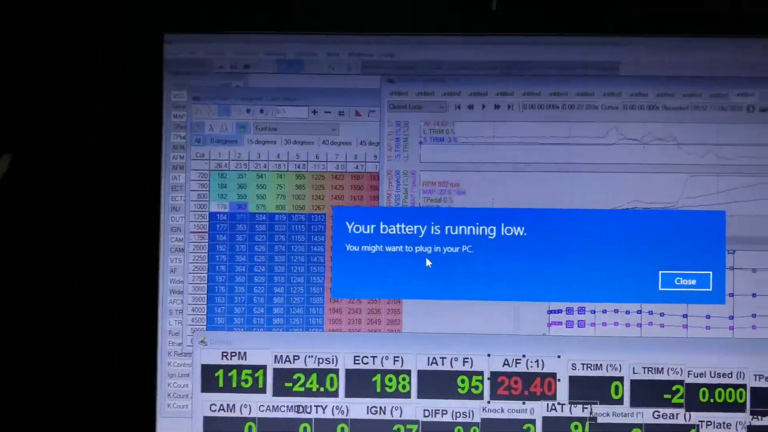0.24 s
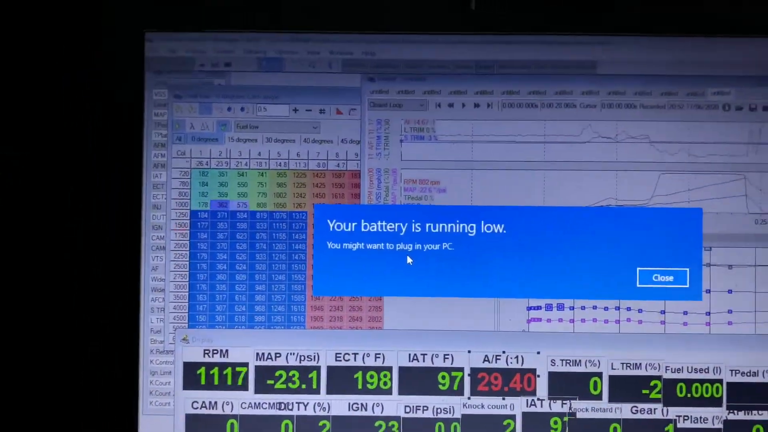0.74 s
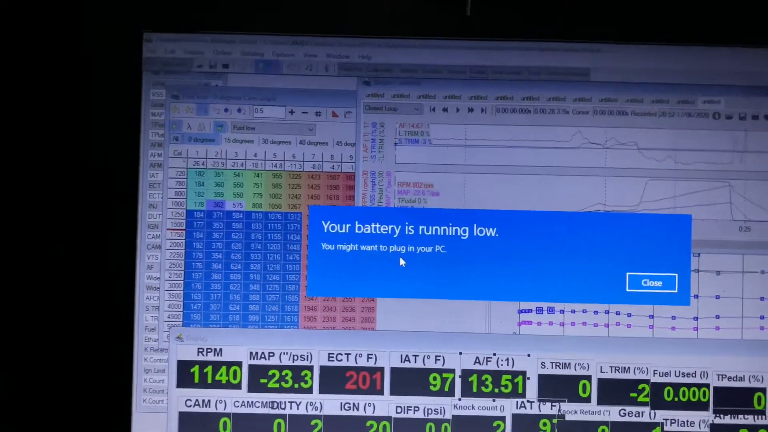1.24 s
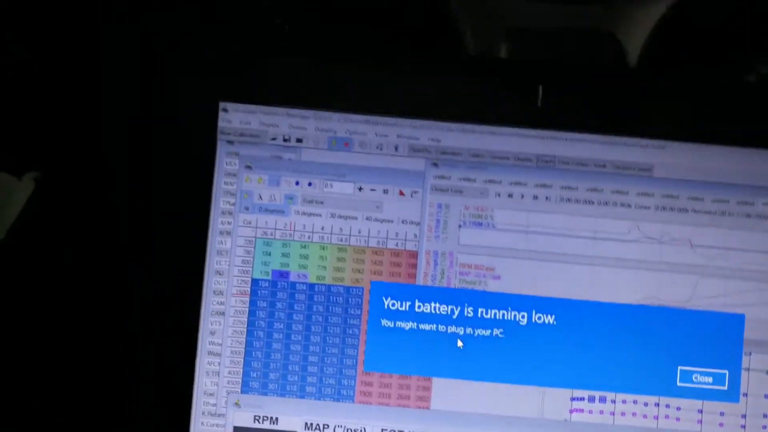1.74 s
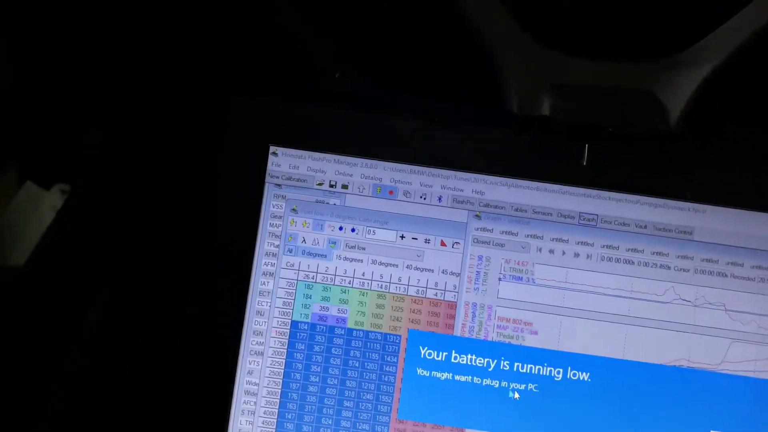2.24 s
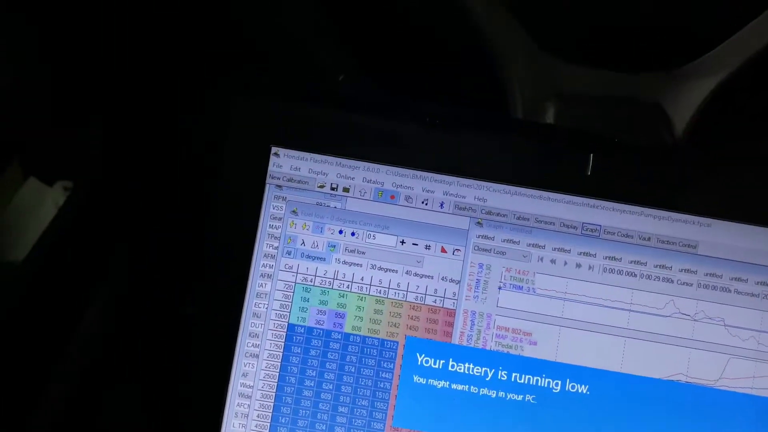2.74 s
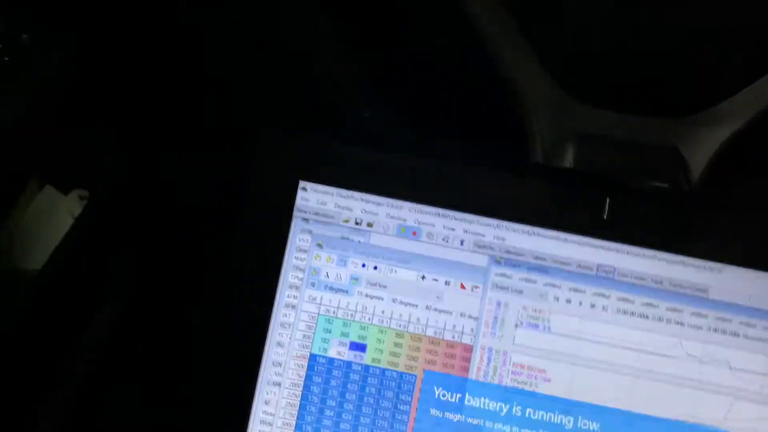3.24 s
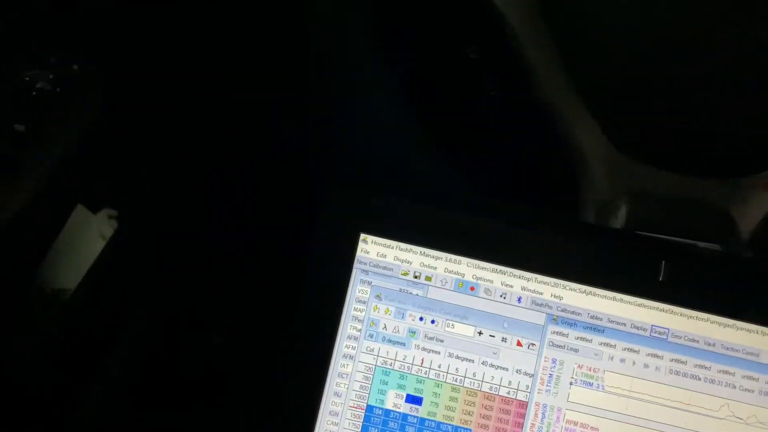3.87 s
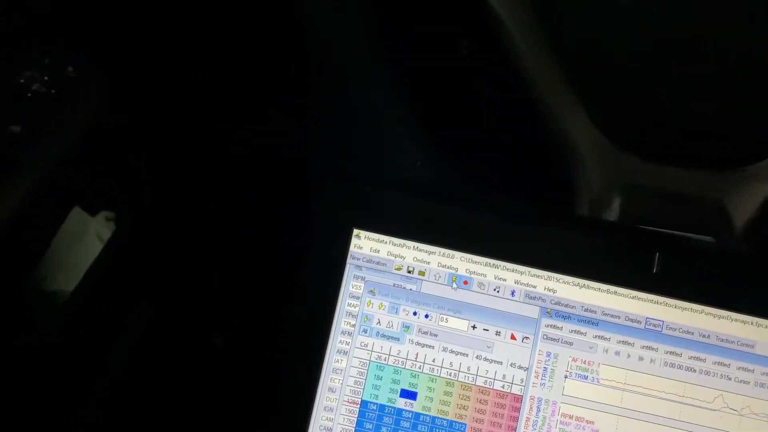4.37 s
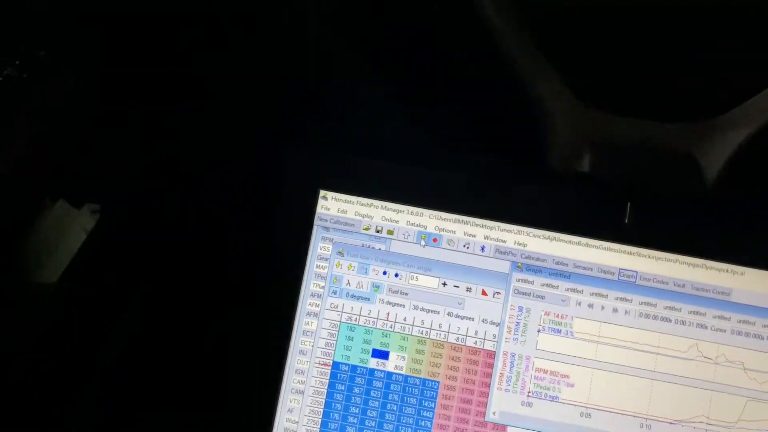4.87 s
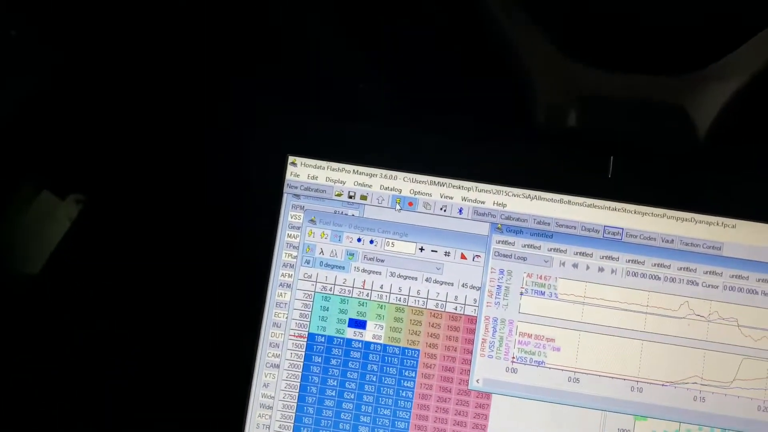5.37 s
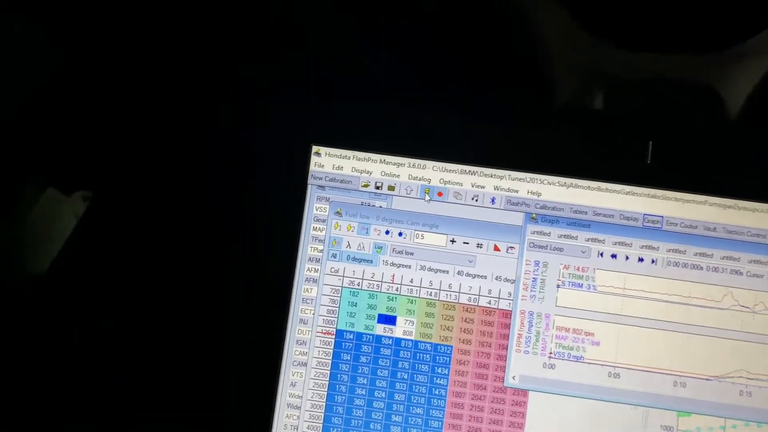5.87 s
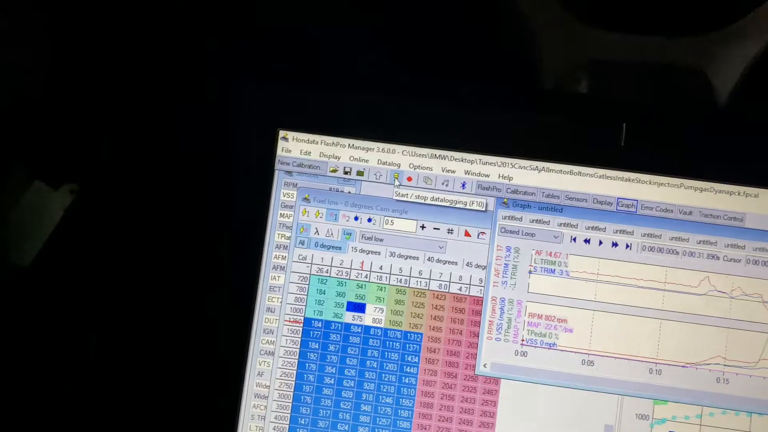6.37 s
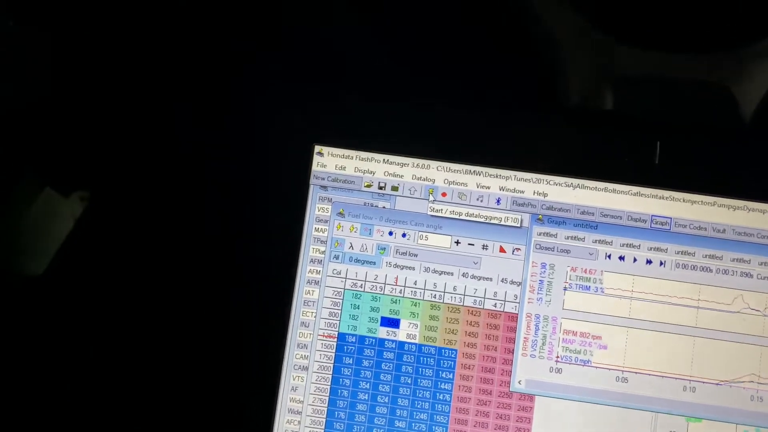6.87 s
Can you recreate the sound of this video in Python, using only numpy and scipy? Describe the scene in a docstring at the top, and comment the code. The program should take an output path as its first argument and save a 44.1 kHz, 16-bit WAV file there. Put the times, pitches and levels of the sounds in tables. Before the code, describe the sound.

A four-cylinder car engine is heard from the driver's seat, its exhaust low and muffled. It opens on a brief blip of throttle, holds a raised idle until about 1.3 seconds, then sinks to a slow idle by 3 seconds. From there a cooling fan outside rushes gradually louder, carrying a faint wavering tone, and the engine hum grows fuller by about 5 seconds. Close to the microphone, a laptop gives a faint knock near 1 second, small button ticks near 3 and 4.5 seconds, a hollow plastic knock at 5.4 and a quick cluster of clicks and taps between 6.2 and 6.4. At about 6.6 seconds a fingertip briefly scrapes the plastic and the throttle opens: the intake hisses and the exhaust booms as the revs dip and recover. One dull thud sounds just after 7 seconds.

```python
"""Four-cylinder car from the driver's seat

The revs sink from a blip to a slow idle; then the throttle opens, the intake hisses and the
exhaust booms as the engine labours. Each firing drives the resonances of pipe and cabin.
A cooling fan rushes outside. Close to the microphone a laptop's buttons click and knocks
ring its hollow case. One dull thud sounds near the end."""
import sys
import numpy as np
from scipy import signal
from scipy.fft import rfft, irfft
from scipy.io import wavfile

SR = 44100
rng = np.random.default_rng(int(sys.argv[2]) if len(sys.argv) > 2 else 0)


def waveform_to_disk(signal):
    """Save audio, clipped to [-1, 1], as 16-bit WAV at the path in sys.argv[1]."""
    frames = np.transpose(np.atleast_2d(signal))
    scaled = np.clip(frames, -1, 1) * 32767
    samples = np.round(scaled).astype(np.int16)
    wavfile.write(sys.argv[1], SR, samples)


N = 313595
T = np.arange(N) / SR
HZ = np.fft.rfftfreq(N, 1 / SR)

# engine load (time [s], level re light idle [dB])
ENGINE_LOAD = [(1.3, 4.5), (2.1, -1.5), (3, -2), (5.3, 4.5), (6.1, 5), (6.59, 8.5), (6.68, 10), (6.78, 12),
               (6.9, 9)]
# rush of air and machinery (time [s], level [dB])
RUSH_LEVEL = [(0, -64.5), (1.5, -63.5), (2.7, -63), (3.4, -60), (4.4, -58.5), (5.3, -57.5), (6.4, -55.5),
              (7.11, -57.5)]
# microphone port balance (frequency [Hz], left minus right [dB])
PORT_BALANCE = [(55, -2.5), (80, 4.5), (115, 0), (160, 2), (270, 2), (520, -2), (1100, 6), (2200, 3.5),
                (4500, 3), (8000, 2), (13000, -2)]
# right port behind left (frequency [Hz], phase [rad])
PORT_LAG = [(30, 0.5), (130, 0.29), (280, 1.33), (520, 1.14), (780, 3.5), (1030, 0.5), (1300, 4.5),
            (1900, 2.5), (3200, -1), (8000, 1.5), (12000, 1)]


def amp(db):
    """Decibels to gain."""
    return 10 ** (np.asarray(db) / 20)


def unit(x):
    """Scale to rms 1; for stereo, the rms of the mid signal."""
    return x / np.sqrt(np.mean(np.atleast_2d(x).mean(0) ** 2) + 1e-20)


def curve(rows):
    """Time table at every sample."""
    return np.interp(T, *np.transpose(rows))


def spectrum(rows, hz=HZ):
    """Frequency table, interpolated on a log axis."""
    row_hz, value = np.transpose(rows)
    return np.interp(np.log(hz + 1), np.log(row_hz + 1), value)


def peaks_db(modes, hz=HZ):
    """Summed resonance peaks and dips."""
    return sum(db / (1 + (2 * (hz - centre) / width) ** 2) for centre, width, db in modes)


def drift(rate_hz):
    """Slow random wander, rms 1."""
    return unit(irfft(rfft(rng.standard_normal(N)) / (1 + (HZ / rate_hz) ** 4), N))


def stereo_noise(colour_db, gate=1):
    """Gated, coloured noise at the two microphone ports."""
    # likeness of the ports (frequency [Hz], coherence [0-1])
    port_coherence = [(30, 0.53), (130, 0.34), (260, 0.53), (520, 0.4), (1000, 0.55), (2000, 0.34),
                      (4500, 0.033), (8000, 0.1), (12000, 0.45)]
    left, independent = rfft(rng.standard_normal((2, N)) * gate)
    coherence = np.clip(spectrum(port_coherence), 0, 1)
    right = coherence * left + np.sqrt(1 - coherence ** 2) * independent
    right *= np.exp(-1j * spectrum(PORT_LAG))
    balance = amp(spectrum(PORT_BALANCE) / 2)
    return unit(irfft(np.array([left * balance, right / balance]) * amp(colour_db), N))


def stereo_tone(phase, hz):
    """A tone at the two microphone ports."""
    balance, lag_rad = amp(spectrum(PORT_BALANCE, hz) / 2), spectrum(PORT_LAG, hz)
    return np.sqrt(2) * np.array([balance * np.cos(phase), np.cos(phase - lag_rad) / balance])


def add(mix, start_s, sound):
    """Mix in a stereo sound."""
    part = mix[:, int(start_s * SR):][:, :sound.shape[1]]
    part += sound[:, :part.shape[1]]


def ring(modes, rise_s=0.0091):
    """Damped modes after a jolt."""
    age = T[:SR // 4]
    tones = sum(amp(db - 60 * age / t60) * stereo_tone(2 * np.pi * hz * age, hz) for hz, db, t60 in modes)
    return (1 - np.exp(-age / rise_s)) * tones


def burst(noise, t60_s, rise_s=0.00024):
    """Random slice of noise with fast attack and exponential decay."""
    age = T[:SR // 4]
    start = rng.integers(N - len(age))
    return noise[:, start:start + len(age)] * (1 - np.exp(-age / rise_s)) * amp(-60 * age / t60_s)


def microphone_hiss(level_db=-82):
    """Steady self-noise of the microphone."""
    # (frequency [Hz], level [dB])
    colour = [(500, -17), (4000, 8), (7000, 1), (8500, -8), (10200, 2.5), (12300, -7), (13400, -28),
              (15300, -2)]
    return amp(level_db) * stereo_noise(spectrum(colour))


def fan_rush(turns, throb=0.023, flutter_db=0.5, ripple_db=1.5, ripple_step_hz=35):
    """Fan and engine-bay noise, throbbing with the firings, coloured by panels and cabin modes."""
    # (frequency [Hz], level [dB])
    fan_colour = [(300, -9.5), (540, 1), (650, -3), (900, -0.5), (1200, -3.5), (1500, -2.5), (2100, -5),
                  (2700, -11.5), (3500, -15), (4100, -19.5), (7200, -25.5), (8200, -32.5), (12000, -37.5),
                  (13500, -55)]
    # panel resonances and dips (frequency [Hz], width [Hz], gain [dB])
    panels = [(660, 160, -0.5), (934, 160, 1.5), (1090, 79, 1), (5590, 180, -7.5), (5690, 110, 6.5),
              (6650, 290, 3.5)]
    # microphone rising from behind the laptop's screen (time [s], share in the clear [0-1])
    clearance = [(1.4, 0.04), (3.3, 0.99)]
    # colour behind the screen (frequency [Hz], gain [dB])
    screen_colour = [(500, -1.5), (700, -0.5), (1050, -3), (1500, 0.5), (2000, -1), (2600, 0.5),
                     (3800, -0.5), (6000, 1)]
    # resonances behind the screen (frequency [Hz], width [Hz], gain [dB])
    screen_modes = [(2430, 190, 1), (3610, 200, 5.5)]
    cabin_db = ripple_db * np.interp(HZ / ripple_step_hz, np.arange(SR), rng.standard_normal(SR))
    colour_db = spectrum(fan_colour) + peaks_db(panels) + cabin_db
    gate = 1 + throb * np.cos(2 * np.pi * turns)
    screened = stereo_noise(colour_db + spectrum(screen_colour) + peaks_db(screen_modes), gate)
    direct = stereo_noise(colour_db, gate)
    clear = np.clip(curve(clearance), 0, 1)
    noise = np.sqrt(1 - clear) * screened + np.sqrt(clear) * direct
    return amp(curve(RUSH_LEVEL) + flutter_db * drift(14)) * noise


def fan_tone(blade_hz=496, waver_hz=3, flutter_db=2.3):
    """Wavering blade tone, slowly rising out of the rush."""
    # (time [s], level re rush [dB])
    prominence = [(1.2, -20), (3.3, -8.5), (4.3, -9.5), (5.0, -5.5), (6.2, -6), (6.7, -10.5)]
    phase = 2 * np.pi * np.cumsum(blade_hz + waver_hz * drift(16.4)) / SR
    level_db = curve(RUSH_LEVEL) + curve(prominence) + flutter_db * drift(6.7)
    return amp(level_db) * stereo_tone(phase, blade_hz)


def cabin_thud(start_s=7.067, gain_db=-18):
    """One jolt rings two low modes."""
    modes = [(127.5, -1, 0.12), (145, -9.5, 0.1)]  # (frequency [Hz], level [dB], t60 [s])
    out = np.zeros((2, N))
    add(out, start_s, amp(gain_db) * ring(modes))
    return out


def finger_scrape(start_s=6.577, gain_db=-47.5, rise_s=0.0037, t60_s=0.042):
    """A fingertip slips briefly on the laptop's plastic."""
    # (frequency [Hz], level [dB])
    colour = [(1000, -12), (2200, 5), (4000, 5), (5300, -4), (6600, 2), (8500, -13), (11000, 1),
              (13500, -15)]
    out = np.zeros((2, N))
    add(out, start_s, amp(gain_db) * burst(stereo_noise(spectrum(colour)), t60_s, rise_s))
    return out


def laptop_clicks(tick_t60_s=0.046, snap_t60_s=0.0025, knock_t60_s=0.064,
                  knock_rise_s=0.001, ring_rise_s=0.0039, spot_db_per_octave=-5.5):
    """Impacts on plastic: buttons snap brightly, knocks ring the hollow case."""
    # impact noise (frequency [Hz], level [dB])
    tick_colour = [(500, -30), (3000, -2), (5200, -11), (7000, -3), (8500, -11), (11000, -1.5),
                   (12600, -11), (13600, -17), (15500, -9.5)]
    knock_colour = [(150, -17), (350, -5), (550, -2), (750, 8), (1400, 9.5), (2400, -0.5), (3400, -5.5),
                    (5500, -11), (7000, -13), (8500, -55), (11500, -27), (15500, -44)]
    # button ticks (time [s], gain [dB])
    ticks = [(2.9961, -60), (4.4912, -53.5), (4.596, -57.5), (6.2703, -50.5), (6.576, -53)]
    # (time [s], impact [dB], hollow ring [dB], low ring [dB], bright tick [dB], struck spot's pitch [Hz])
    knocks = [(1.105, -56, -68, -57, -84, 1500), (5.3865, -48, -60, -54, -70, 1400),
              (5.3965, -45.5, -44, -49, -59, 1380), (6.2225, -42.5, -39, -63, -60, 1550),
              (6.2285, -53, -62, -38, -71, 1550), (6.2405, -48, -43, -48, -65, 2400),
              (6.2786, -47, -49, -53, -54, 1300), (6.315, -53, -51, -60, -69, 2250),
              (6.3734, -49, -49, -57, -65, 1300), (6.3812, -43.5, -39, -63, -60, 2200),
              (6.9174, -49, -58, -45, -67, 1100), (7.0618, -47, -49, -44, -72, 1490)]
    # hollow ring and low ring (frequency [Hz], level [dB], t60 [s])
    case_modes = [(1150, -5, 0.026), (1368, 1.5, 0.041), (1553, 6, 0.041), (1900, -1, 0.045),
                  (2227, 1.5, 0.036), (2425, -2, .035), (2760, -9, .04), (4220, -7, 0.032),
                  (6750, -5.5, 0.04)]
    body_modes = [(545, -2, 0.048), (501, -1, 0.048), (427, -1.5, 0.057), (342, -4, 0.055),
                  (292, -15, 0.06)]
    tick, knock = stereo_noise(spectrum(tick_colour)), stereo_noise(spectrum(knock_colour))
    out = np.zeros((2, N))
    for start_s, gain_db in ticks:
        bright = amp(-3) * burst(tick, tick_t60_s)
        snap = amp(1) * burst(tick, snap_t60_s)
        hollow = amp(-7) * burst(knock, tick_t60_s)
        add(out, start_s, amp(gain_db) * (bright + snap + hollow))
    for start_s, impact_db, case_db, body_db, bright_db, spot_hz in knocks:
        # the struck spot favours modes near its pitch
        excited = [(hz, db + spot_db_per_octave * abs(np.log2(hz / spot_hz)), t60)
                   for hz, db, t60 in case_modes]
        add(out, start_s, amp(impact_db - 3) * burst(knock, knock_t60_s, knock_rise_s))
        add(out, start_s, amp(bright_db) * burst(tick, knock_t60_s, knock_rise_s))
        add(out, start_s, amp(case_db) * ring(excited, ring_rise_s))
        add(out, start_s, amp(body_db + 4) * ring(body_modes, ring_rise_s))
    return out


def throttle_opening(ease_s=0.85, shut_s=0.09):
    """Each pedal press ramps up, eases while held and falls shut."""
    # (start [s], rise [s], hold [s], opening [0-1])
    presses = [(0.0, 0.05, 0.14, 0.91), (6.579, 0.018, 0.19, 1.0), (6.837, 0.025, 0.21, 0.45)]
    throttle = np.zeros(N)
    for start_s, rise_s, hold_s, opening in presses:
        age = np.maximum(T - start_s, 0)
        release = np.exp(-age / ease_s - np.maximum(age - hold_s, 0) / shut_s)
        throttle += opening * np.minimum(age / rise_s, 1) * release
    return np.clip(throttle, 0, 1)


def intake_hiss(throttle, level_db=-65, far_db=-7, move_s=4):
    """Air hisses past the open throttle plate, quieter until the microphone has moved."""
    # (frequency [Hz], level [dB])
    colour = [(850, -24), (1070, 19.5), (1250, -12), (4500, -27), (6000, -7), (7400, -9), (8400, -17),
              (10200, -10), (12000, -24), (13500, -58)]
    position_db = far_db * (1 - np.clip(T / move_s, 0, 1))
    return throttle * amp(level_db + position_db) * stereo_noise(spectrum(colour))


def stumble_gain():
    """Weak firings briefly dip the exhaust."""
    # (time [s], half length [s], dip [dB])
    dips = [(0.342, 0.063, -1.5), (1.317, 0.081, -2), (6.82, 0.014, -2), (7.025, 0.047, -3.5)]
    return amp(sum(db * np.exp(-((T - time_s) / half_s) ** 2) for time_s, half_s, db in dips))


def gas_puffs(turns, revs_oct, throttle, shut_db=-54, open_db=-63, coast_db_per_octave=-9,
              flow_db=12, flow_db_per_octave=21, decay_firings=0.52):
    """Turbulent gas leaves with each firing: less when coasting, growling with the throttle open."""
    # (frequency [Hz], level [dB])
    colour = [(15, -28), (35, -14), (55, 5), (90, -3.5), (135, -2.5), (200, -2.5), (260, -12), (330, -11),
              (440, -13), (560, -26.5), (700, -40), (1500, -61)]
    # pipe resonances under hard puffs (frequency [Hz], width [Hz], gain [dB])
    growl_modes = [(218, 20, 4), (289, 25, 6), (400, 23, 9.5), (620, 230, 4)]
    gas_db = curve(ENGINE_LOAD) + throttle * (flow_db + flow_db_per_octave * revs_oct)
    gate = 1 + np.exp(-(turns % 1) / decay_firings)
    coast_db = coast_db_per_octave * np.maximum(revs_oct, 0)
    soft = amp(shut_db + coast_db) * stereo_noise(spectrum(colour), gate)
    growl = amp(open_db) * stereo_noise(spectrum(colour) + peaks_db(growl_modes), gate)
    return amp(gas_db) * ((1 - throttle) * soft + np.sqrt(throttle) * growl)


def pipe_thumps(turns, throttle, gain_db=-55, uneven=0.23):
    """With the throttle open, each firing kicks the pipe into ringing."""
    # (frequency [Hz], level [dB], t60 [s])
    modes = [(116, -5, 0.067), (212, -12, 0.13), (280, -17, 0.13), (401, -12, 0.12)]
    fired = np.diff(np.floor(turns), prepend=0)
    strength = amp(gain_db + curve(ENGINE_LOAD)) * (1 + uneven * rng.standard_normal(N))
    kicks = fired * throttle * strength
    return signal.oaconvolve(kicks[None], ring(modes), axes=1)[:, :N]


def pipe_drone(throttle, pitch_hz=159, level_db=-40.5, waver_hz=2, flutter_db=2):
    """An open throttle sustains the pipe's strongest resonance, its pitch independent of the revs."""
    phase = 2 * np.pi * np.cumsum(pitch_hz + waver_hz * drift(14)) / SR
    return throttle ** 2 * amp(level_db + flutter_db * drift(25)) * stereo_tone(phase, pitch_hz)


def silencer_gain(hz, cutoff_hz=436):
    """Silencer and cabin resonate; the packing absorbs what lies above."""
    # (frequency [Hz], width [Hz], gain [dB])
    modes = [(193, 16, -1), (214, 14, 2), (246, 12, -9.5), (266.5, 6.3, -8), (282.4, 5.5, -4),
             (330, 22, -13.5), (393.4, 11, -7)]
    response = sum(amp(db) / (1 + 1j * (hz ** 2 - centre ** 2) / (hz * width))
                   for centre, width, db in modes)
    return abs(response) / (1 + (hz / cutoff_hz) ** 10)


def exhaust_orders(turns, firing_hz, revs_oct, throttle, orders=17, free_oct=0.22, linger_s=0.096,
                   low_db_per_octave=-1, upper_db=-65.5, upper_db_per_octave=8, pressure_db=17,
                   uneven=0.062, labour=0.038, steady_db=-12, smear_rad=0.9):
    """Firings push the pipe: harmonics of the firing rate, no two firings alike."""
    # orders from the first up (idle [dB], full-throttle lift at low revs [dB],
    # same at high revs [dB], load slope [dB/dB])
    low_orders = [(-62.5, 2, 10, 0), (-53.8, 11.5, 7.6, .5), (-63, -5, 4.7, 1.5), (-65, 7.5, 5.6, 0.84),
                  (-67.5, -3, 6.6, 0.75), (-67, -3, 12.5, .5)]
    # cylinders in firing order (strength offset [ratio])
    cylinders = [0.026, -0.034, 0.031, -0.055]
    # cabin standing waves (frequency [Hz], width [Hz], gain [dB])
    cabin_modes = [(31.7, 3.9, 6.5), (37, 5.3, -2.5), (50.23, 11.1, 9.5), (64.25, 11.1, 13),
                   (76.04, 3.5, 6), (95, 5.9, -2), (113.6, 14.2, 7.5), (131, 24.4, 18.5),
                   (149.7, 9.7, -2.5), (157.87, 10.9, 18), (171, 8.8, 5.5), (183.8, 6, 11), (191, 5, -11),
                   (212.3, 12, 8)]
    load_db = curve(ENGINE_LOAD)
    free = np.clip(revs_oct / free_oct, 0, 1)  # 0 labouring, 1 revving freely and evenly
    # pressure builds with flow and lingers after the throttle shuts
    pole = np.exp(-1 / (linger_s * SR))
    pressure = signal.lfilter([1 - pole], [1, -pole], throttle * (1 + free) / 2)
    upper_gain = amp(load_db + upper_db + pressure_db * pressure + upper_db_per_octave * revs_oct)
    imbalance = np.interp(turns, np.arange(len(cylinders)), cylinders, period=len(cylinders))
    firings = np.arange(int(turns[-1]) + 2)
    out = np.zeros((2, N))
    for k in range(1, orders + 1):
        order_hz = k * firing_hz
        if k <= len(low_orders):
            idle_db, boom_db, blip_db, load_slope = low_orders[k - 1]
            open_db = throttle * ((1 - free) * boom_db + free * blip_db)
            drive_db = idle_db + open_db + load_slope * load_db + low_db_per_octave * revs_oct
            gain = amp(drive_db + peaks_db(cabin_modes, order_hz))
        else:
            gain = upper_gain * np.interp(T, T[::100], silencer_gain(order_hz[::100]))
        # uneven burning disturbs higher orders more, most with the throttle open
        rough = (uneven + labour * throttle) * amp(steady_db * free) * k / 2
        burn = np.interp(turns, firings, rng.standard_normal(len(firings)))
        timing = np.interp(turns, firings, rng.standard_normal(len(firings)))
        strength = (1 + rough * burn + imbalance * (1 - revs_oct) * k / 2) / np.sqrt(1 + rough ** 2)
        # the pipe delays higher orders, spreading each pulse into a hum
        phase = 2 * np.pi * k * turns - smear_rad * k ** 2 + rough * timing
        out += gain * strength * stereo_tone(phase, order_hz.mean())
    return out


def scene():
    """Engine speed times the firings; throttle and load set their force."""
    # engine speed (time [s], firing rate [Hz])
    speed = [(0.0, 40.6), (0.07, 38.6), (0.18, 34.7), (0.3, 35.5), (0.65, 38.3), (1.09, 37.9), (1.37, 36.5),
             (1.75, 33.7), (2.1, 31.4), (2.46, 29.9), (2.9, 28.0), (3.19, 27.6), (5.58, 27.0), (6.56, 27.3),
             (6.67, 26.0), (6.74, 23.6), (6.8, 23.0), (6.87, 26.5), (7.11, 28.2)]
    firing_hz, throttle = curve(speed), throttle_opening()
    turns = np.cumsum(firing_hz * (1 + 0.004093 * drift(6.63))) / SR  # one turn per firing
    revs_oct = np.log2(firing_hz / np.median(firing_hz))  # octaves above idle
    exhaust = exhaust_orders(turns, firing_hz, revs_oct, throttle) + gas_puffs(turns, revs_oct, throttle)
    exhaust += pipe_thumps(turns, throttle) + pipe_drone(throttle)
    engine = stumble_gain() * exhaust + intake_hiss(throttle)
    fan = fan_rush(turns) + fan_tone()
    laptop = laptop_clicks() + finger_scrape()
    return engine + fan + laptop + cabin_thud() + microphone_hiss()


def record(dry):
    """Low-pass at 15.75 kHz."""
    lowpass = signal.firwin(511, 15750, window=("kaiser", 9), fs=SR)
    return signal.oaconvolve(dry, lowpass[None], "same")


dry = scene()
out = record(dry)
waveform_to_disk(out)
```